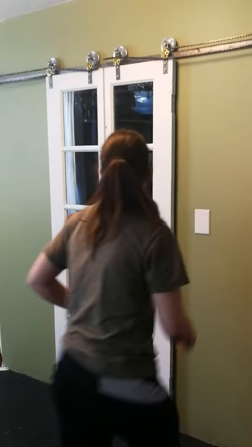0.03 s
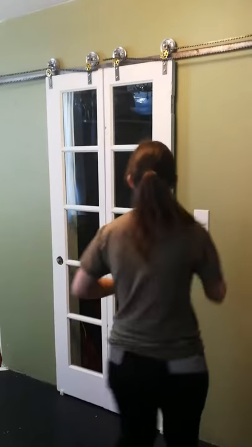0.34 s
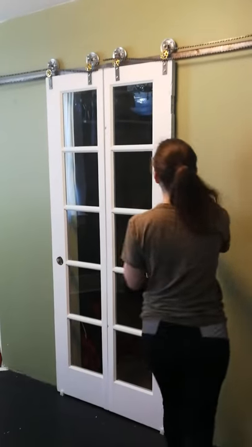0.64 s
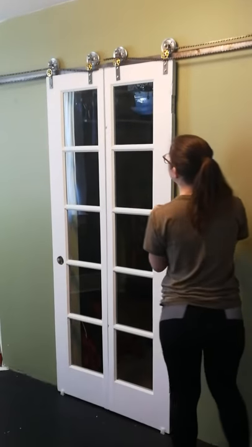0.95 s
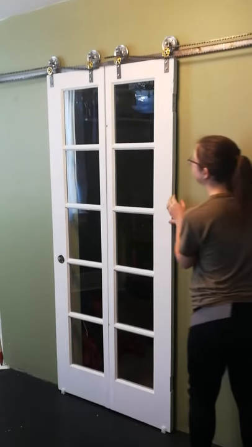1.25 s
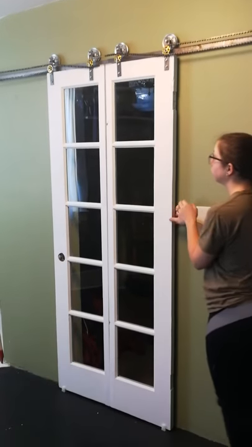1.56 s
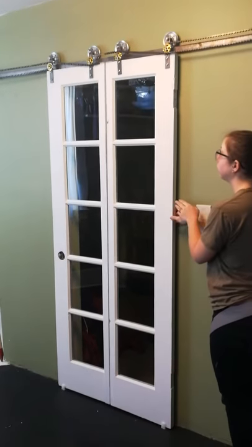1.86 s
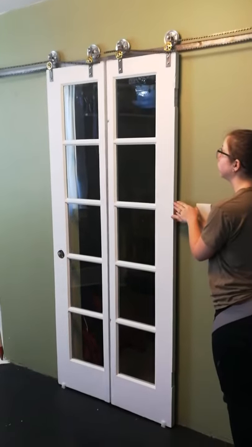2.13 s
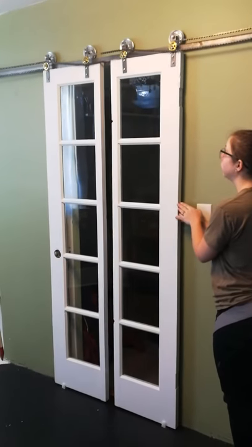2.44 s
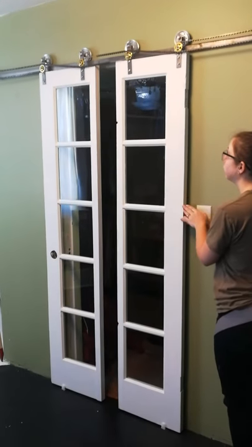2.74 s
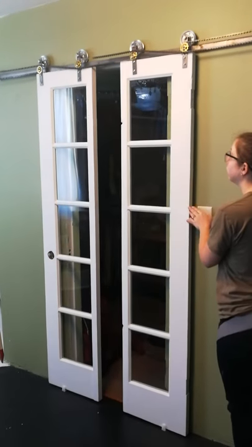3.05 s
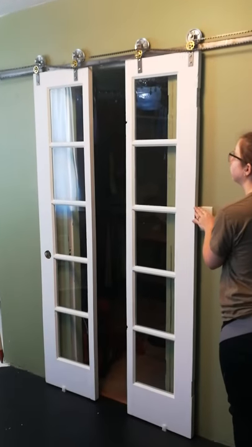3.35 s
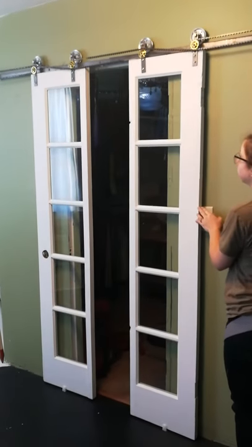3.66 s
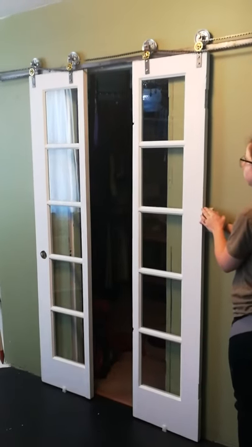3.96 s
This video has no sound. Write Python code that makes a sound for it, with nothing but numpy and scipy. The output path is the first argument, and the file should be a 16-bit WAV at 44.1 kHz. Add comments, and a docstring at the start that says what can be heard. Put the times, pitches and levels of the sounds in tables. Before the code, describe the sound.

Soft steps, then a chain clatters and rollers grind as hanging doors slide apart.

```python
"""A few soft, scuffing steps cross a quiet room, and a wall switch ticks. Then a chain drive pulls two
glazed doors apart: links clatter in bunches on sprocket and rail, rollers grind and scrape along the
overhead rail, and the hanging panels rumble and thud as they are tugged. It is all heard from a few
metres away, with plenty of room around it, over a faint hiss of air and the deep drone of the house."""
import sys
import numpy as np
from scipy import signal
from scipy.fft import rfft, irfft
from scipy.io import wavfile

SR = 44100
rng = np.random.default_rng(int(sys.argv[2]) if len(sys.argv) > 2 else 0)


def wav_record(signal):
    """Record a signal, one row per channel, as 16-bit PCM in the file named by sys.argv[1]."""
    frames = np.transpose(np.atleast_2d(signal))
    bounded = np.clip(frames, -1, 1)
    # unit amplitude maps onto the largest positive 16-bit level
    quanta = np.round(bounded * 32767).astype(np.int16)
    wavfile.write(sys.argv[1], SR, quanta)


N = 176400

# bunches of links striking sprocket and rail: start_s, level_db, jingle_db, knock_db, rattle_decay_s
CLACKS = [(1.9385, -43.5, -30, -15, 0.048), (1.9679, -41.5, -16, -6.5, 0.069),
          (2.0095, -35.5, -15.5, -10, 0.06), (2.0988, -34, -15, -4.5, 0.015),
          (2.157, -30.5, -18.5, -13, 0.042), (2.2111, -35, -7, -5.5, 0.0047),
          (2.2602, -34.5, -12.5, -11.5, 0.011), (2.3107, -29.5, -10, -16, 0.012),
          (2.3628, -31.5, -7.5, -22, 0.012), (2.4124, -31, -13, -11, 0.053),
          (2.4547, -29.5, -19.5, -16.5, 0.023), (2.554, -38.5, -15, -9, 0.02),
          (2.6283, -39, -19, -11, 0.0072), (2.6638, -37.5, -20, -15, 0.0093),
          (2.6864, -33.5, -24, -18, 0.024), (2.7074, -33.5, -13.5, -10, 0.0065),
          (2.7262, -38, -17, -23, 0.0072), (2.7928, -37.5, -18.5, -10, 0.013),
          (2.816, -36.5, -21, -19, 0.0096), (2.851, -32.5, -13, -12.5, 0.012),
          (2.8792, -40, -30, -32, 0.035), (2.9265, -34.5, -10.5, -13.5, 0.012),
          (2.9777, -32.5, -15.5, -12.5, 0.0032), (2.9921, -41.5, -18, -9, 0.0093),
          (3.065, -41, -12, -8.5, 0.021), (3.0971, -38.5, -18.5, -10, 0.015),
          (3.1176, -33, -18.5, -15, 0.015), (3.1369, -42, -13, -6.5, 0.03),
          (3.1945, -36.5, -18, -38, 0.0065), (3.2318, -34, -17, -6.5, 0.018),
          (3.2551, -40.5, -32, -4.5, 0.009), (3.3935, -42.5, -15, -7.5, 0.014),
          (3.4191, -40.5, -39, -9.5, 0.014), (3.4736, -38.5, -22.5, -12.5, 0.02),
          (3.5326, -39, -29, -10.5, 0.011), (3.55, -43, -17, -28, 0.016), (3.5777, -42, -12.5, -7, 0.022),
          (3.6389, -43.5, -12, -15.5, 0.0032), (3.693, -40.5, -7.5, -7.5, 0.016),
          (3.7284, -43, -16.5, -18, 0.0085), (3.7981, -40, -12, -9.5, 0.021),
          (3.8401, -38, -29, -21, 0.0049), (3.8786, -40.5, -19.5, -11, 0.023),
          (3.9371, -42, -26, -14, 0.01), (3.9583, -41.5, -16, -12.5, 0.0082), (3.985, -48, -20, -6, 0.017)]
# tone of a link's impact: frequency_hz, gain_db
LINK_COLOUR = [(200, -5), (330, 15), (500, -7), (800, -5), (1000, -3), (1570, 3.5), (2700, 4.5),
               (4240, 3.5), (5860, -11.5), (7150, -9.5), (9050, -19), (11600, -44), (15000, -46.5)]
# resonances of chain and rail: pitch_hz, width_hz, level_db
METAL_MODES = [(950, 10, -9), (3180, 1200, 10), (3740, 590, 2.5), (4450, 610, 12.5), (5500, 160, 0),
               (8300, 550, -13)]
# narrow resonances that sing on after each clack: pitch_hz, width_hz, level_db
STEEL_MODES = [(3576, 41, 1), (4318, 96, 4), (4745, 58, -6), (7520, 140, -6.5)]
# swell of the rollers' grind and the doors' rumble: time_s, grind_db, rumble_db
ROLLING_LEVELS = [(1.97, -55, -72), (2.009, -45, -64.5), (2.13, -42.5, -53.5), (2.31, -40, -62),
                  (2.49, -45, -55.5), (2.52, -47, -61.5), (2.57, -43, -55.5), (2.7, -53, -64),
                  (3.02, -47.5, -62), (3.06, -51.5, -76), (3.14, -46.5, -62), (3.3, -52.5, -66),
                  (3.38, -56.5, -83), (3.449, -56, -68.5), (3.89, -50.5, -81), (4.0, -50, -69)]
# tone of the grinding rollers: frequency_hz, gain_db
GRIND_COLOUR = [(200, 1.5), (500, 1.5), (900, 4.5), (1600, 6), (2300, 9.5), (3500, -4.5), (4400, 6),
                (6000, -7), (7800, -22), (10800, -20.5), (15000, -45)]
# fits of wheel scrape once the doors are under way: time_s, level_db
SCRAPE_LEVELS = [(2.6, -88.5), (2.73, -83), (2.78, -56.5), (2.92, -53.5), (2.995, -43), (3.06, -93),
                 (3.35, -80), (3.5, -61), (3.66, -57), (3.72, -51), (3.79, -81), (3.86, -70), (3.92, -66),
                 (4.0, -45.5)]
# resonances of the scraping wheels: pitch_hz, width_hz, level_db
WHEEL_MODES = [(3450, 80, 0), (4080, 140, -4), (4340, 190, -1)]
# tones of the struck rail: start_s, pitch_hz, level_db, decay_s
RAIL_RINGS = [(1.971, 1154, -51.5, 0.09), (1.97, 1610, -57, 0.044), (1.971, 1896, -54, 0.04),
              (2.095, 906, -41.5, 0.024), (2.19, 910, -38.5, 0.031), (2.45, 804, -51, 0.018),
              (3.715, 3480, -54.5, 0.031)]
# resonances of the hanging doors: pitch_hz, width_hz, level_db
DOOR_MODES = [(86, 12.7, 0.5), (127.7, 9.7, -2.5), (202, 33, -5), (242.7, 62, -5.5), (306.5, 21, -11.5)]
# heavy jolts of the doors: start_s, level_db, decay_s
JOLTS = [(2.035, -60, 0.047), (2.08, -53, 0.058), (2.42, -54, 0.03), (2.835, -52.5, 0.015),
         (3.12, -64.5, 0.039)]
# bassy tone of a jolt: frequency_hz, gain_db
JOLT_COLOUR = [(50, -21), (80, 14), (130, 6.5), (200, 5), (340, 0), (480, -21), (1000, -48)]
# pitched thuds of the tugged panels: start_s, pitch_hz, level_db, decay_s
PANEL_THUDS = [(2.085, 196, -48, 0.023), (2.114, 80.7, -43, 0.055), (2.335, 203.5, -52.5, 0.029),
               (3.129, 222.5, -53, 0.032), (3.311, 96.7, -55.5, 0.063)]
# slow sway of the doors: time_s, level_db
SWAY_LEVELS = [(1.97, -67), (2.35, -41), (2.65, -55), (3.01, -38.5), (3.09, -50.5), (3.27, -38.5),
               (3.3, -46.5), (4.0, -73)]
# soles and clothes brushing: peak_s, rise_s, fall_s, swish_db, scrape_db, footfall_db
STEPS = [(.29, 0.093, 0.074, -70.5, -106, -100), (.445, 0.041, 0.053, -60, -78, -60.5),
         (0.533, 0.042, 0.046, -56.5, -69.5, -73.5), (0.876, 0.069, 0.085, -58.5, -85, -66),
         (.95, 0.061, 0.08, -62, -65, -69), (1.09, 0.083, 0.038, -62, -87, -101),
         (1.341, 0.069, 0.043, -54, -56, -63), (3.32, 0.03, 0.075, -60, -62, -64.5)]
# airy swish of cloth: frequency_hz, gain_db
CLOTH_COLOUR = [(500, -18.5), (1300, -12), (2200, 1), (4500, 0.5), (6200, -3.5), (7600, 2), (9300, -1),
                (11000, -16.5), (15000, -24)]
# midrange scuff of a sole: frequency_hz, gain_db
SOLE_COLOUR = [(300, -45), (600, -12), (1000, -7.5), (1600, -4), (3000, -15.5), (8000, -35.5)]
# dull pad of a landing foot: frequency_hz, gain_db
FOOTFALL_COLOUR = [(100, -17), (200, -19), (280, 3.5), (410, -3.5), (540, -14), (1500, -27)]
# weight settling on the floor: start_s, pitch_hz, level_db, decay_s
FLOOR_THUDS = [(.48, 42.4, -61, 0.033), (0.68, 190.6, -66, 0.098), (1.057, 48.4, -52, 0.052),
               (1.138, 49, -53.5, 0.032)]
# ticks of the wall switch: start_s, pitch_hz, width_hz, level_db
SWITCH_TICKS = [(1.625, 3370, 1780, -41.5), (1.641, 3020, 1800, -41), (1.695, 1810, 600, -34.5),
                (1.7152, 2540, 447, -34), (1.7174, 2380, 380, -26.5), (1.731, 2200, 300, -39)]
# room tone: frequency_hz, gain_db
AIR_COLOUR = [(15, -12.5), (25, -3.5), (54, -5), (77, -9.5), (220, -19.5), (363, -23), (427, -27.5),
              (811, -29), (879, -24), (2700, -28.5), (4380, -30), (7680, -29.5), (15000, -40)]
# stereo placement of chain, wheels and rail: frequency_hz, left_minus_right_db
DRIVE_PAN = [(100, 0), (450, -2), (1000, -1.5), (2200, -6.5), (4000, -5), (6500, -3.5), (8000, -3.5),
             (10000, 8), (15000, -2)]

DRIVE_START_S, DRIVE_RISE_S = 1.935, 0.028
LINKS_PER_S, GRIT_PER_S, BUMPS_PER_S = 2600, 900, 220
CLACK_LEAD_S = 0.0015  # each clack starts just before its listed time
BUNCH_RISE_S, BUNCH_HOLD_S = 0.001, 0.0058
KNOCK_DB, CLANK_DB, JINGLE_DB = 23.5, 19, 32  # the chain's low, middle and high registers
KNOCK_TOP_HZ, JINGLE_BOTTOM_HZ = 1270, 5800
RATTLE_DB, METAL_RING_DB, STEEL_RING_DB = 6, -25.5, -25
GRIND_DB, RAIL_SING_DB, RUMBLE_DB, SWAY_DB = -5, -19.5, 4.5, -11
FLUTTER_HZ, FLUTTER_DB = 28, 2
PERSON_PAN_DB = -5.5  # left minus right
AIR_DB, DRONE_DB = -64, -69
TAIL_T60_S, TREBLE_T60_S, TAIL_BUILD_S, TAIL_DB = 0.33, 0.27, 0.0051, 1.5
ECHO_DECAY_S, ECHO_DB = 0.0092, 0.5
LEFT_LAG_S, MONO_BELOW_HZ = 0.00059, 444


def chain(size=8192, count=6):
    """Each clack is a dense crunch of links and a dying rattle, at one of several spots on the rail."""
    t = np.arange(size) / SR
    spots = np.zeros((count, N + 2 * size))
    link_tone = colour(LINK_COLOUR)
    for k, (start, db, jingle_db, knock_db, rattle_s) in enumerate(CLACKS):
        landing = np.exp(-(t / BUNCH_HOLD_S) ** 2) + undb(RATTLE_DB) * np.exp(-t / rattle_s)
        attack = 1 - np.exp(-t / BUNCH_RISE_S)
        links = grains(LINKS_PER_S, scatter_db=2, size=size) * landing * attack
        links[0] += undb(1)  # the first link gives the clack its edge
        hit = signal.fftconvolve(links, link_tone)[:size]
        clank = undb(CLANK_DB) * unit_energy(band(hit, [KNOCK_TOP_HZ, JINGLE_BOTTOM_HZ], "band"))
        jingle = undb(JINGLE_DB + jingle_db) * unit_energy(band(hit, JINGLE_BOTTOM_HZ, "high", order=5))
        knock = undb(KNOCK_DB + knock_db) * unit_energy(band(hit, [500, KNOCK_TOP_HZ], "band"))
        i = int((start - CLACK_LEAD_S) * SR)
        spots[k % count, i:i + size] += undb(db) * (clank + jingle + knock)
    out = 0
    for clacks in spots[:, :N]:
        sing = undb(STEEL_RING_DB) * convolve(clacks, ring(detuned(STEEL_MODES)))
        out += room(metal_body(clacks) + sing, wet_db=3.5)
    return out


def metal_body(x):
    """Chain and rail pass on the crack of an impact and add a short, faint ring."""
    body = undb(METAL_RING_DB) * ring(METAL_MODES)
    body[0] += 1
    return convolve(x, unit_energy(body))


def drive_engaged(t):
    """Quick fade-in as the drive takes up the load."""
    return np.clip((t - DRIVE_START_S) / DRIVE_RISE_S, 0, 1) ** 2


def rollers(t, count=4):
    """The wheels grind over the rail, which sings faintly at one pitch."""
    times, grind_db, _ = np.array(ROLLING_LEVELS).T
    load = drive_engaged(t) * undb(np.interp(t, times, grind_db)) / np.sqrt(count)
    out = 0
    for _ in range(count):
        grit = unit(metal_body(convolve(grains(GRIT_PER_S, scatter_db=4.5), colour(GRIND_COLOUR))))
        sing = unit(pitched_noise(pitch_hz=893, width_hz=7.9))
        out += room(load * (undb(GRIND_DB) * grit + undb(RAIL_SING_DB) * sing), wet_db=-6)
    return out


def wheel_scrape(t, count=3):
    """The wheels rub the rail unevenly and ring in bright, fluttering fits."""
    load = drive_engaged(t) * undb(np.interp(t, *np.array(SCRAPE_LEVELS).T)) / np.sqrt(count)
    out = 0
    for _ in range(count):
        flutter = undb(FLUTTER_DB * unit(band(rng.standard_normal(N), FLUTTER_HZ, "low", order=2)))
        friction = flutter * grains(per_s=1500, scatter_db=2.5)
        ringing = convolve(friction, ring(detuned(WHEEL_MODES)))
        out += room(load * unit(band(ringing, [3000, 4900], "band", order=2)), wet_db=4)
    return out


def rail(t):
    """The rail rings as the chain pulls taut or a wheel knocks it."""
    return room(struck_tones(t, RAIL_RINGS, rise_s=0.0029), wet_db=-10.5)


def door_rumble(t):
    """Bumps of the wheels shake the hanging panels; the chain jolts them now and then."""
    times, _, rumble_db = np.array(ROLLING_LEVELS).T
    load = drive_engaged(t) * undb(RUMBLE_DB + np.interp(t, times, rumble_db))
    shaking = unit(convolve(grains(BUMPS_PER_S, scatter_db=1), ring(DOOR_MODES)))
    jolts = sum(blow(t, start, db, decay, rise_s=0.022) for start, db, decay in JOLTS)
    return load * shaking + jolts * noise(JOLT_COLOUR)


def door_thuds(t):
    """Each tug draws one low note from the panels."""
    return struck_tones(t, PANEL_THUDS, rise_s=0.014)


def door_sway(t):
    """Doors and wall shudder in the sub-bass."""
    shudder = unit(band(pitched_noise(pitch_hz=31.5, width_hz=10.4), [27, 48], "band", order=2))
    return drive_engaged(t) * undb(SWAY_DB + np.interp(t, *np.array(SWAY_LEVELS).T)) * shudder


def steps(t):
    """Each soft step swells and fades with its own echoes: cloth swishes, the sole scuffs and lands."""
    layers = np.array([noise(CLOTH_COLOUR), noise(SOLE_COLOUR), noise(FOOTFALL_COLOUR)])
    out = 0
    for peak, rise, fall, *layer_db in STEPS:
        swell = np.exp(-(np.minimum(t - peak, 0) / rise) ** 2 - np.maximum(t - peak, 0) / fall)
        out += room(swell * (undb(layer_db) @ layers), wet_db=5)
    return out


def floorboards(t):
    """The floor gives underfoot with deep, faint thuds."""
    return struck_tones(t, FLOOR_THUDS, rise_s=0.0096)


def wall_switch():
    """The pressed switch gives tiny ticks that ring for a few milliseconds."""
    out = np.zeros(N)
    for start, hz, width, db in SWITCH_TICKS:
        edges_hz = [max(hz - width, hz / 2), hz + width]
        tick = unit_energy(band(ring([(hz, width, 0)]), edges_hz, "band", order=2))
        i = int(start * SR)
        out[i:i + len(tick)] += undb(db) * tick
    return room(out, wet_db=-6)


def room_tone():
    """A faint bed of air over the deep drone of the house."""
    drone = unit(band(pitched_noise(pitch_hz=44.3, width_hz=1.6), [36, 56], "band", order=2))
    return undb(AIR_DB) * diffuse(noise(AIR_COLOUR), noise(AIR_COLOUR)) + undb(DRONE_DB) * drone


def room(x, wet_db):
    """Direct sound, arriving first on the right, then echoes off near walls and a short tail."""
    t = np.arange(SR // 2) / SR
    walls = []
    for _ in range(2):
        hiss = rng.standard_normal(len(t))
        low = band(hiss, 6000, "low", order=1)
        tail = low * undb(-60 * t / TAIL_T60_S) + (hiss - low) * undb(-60 * t / TREBLE_T60_S)
        tail *= 1 - np.exp(-t / TAIL_BUILD_S)
        echoes = grains(per_s=1500, scatter_db=5.5, size=len(t)) * np.exp(-t / ECHO_DECAY_S)
        walls.append(undb(TAIL_DB) * unit_energy(tail) + undb(ECHO_DB) * unit_energy(echoes))
    left, right = undb(wet_db) * diffuse(*walls)
    right[0] += 1
    left[round(LEFT_LAG_S * SR)] += 1
    return np.array([convolve(x, unit_energy(left)), convolve(x, unit_energy(right))])


def diffuse(a, b, steepness=3.2):
    """Spread two signals into sound from all sides: centred bass, wide treble."""
    alike = np.exp(-(np.fft.rfftfreq(len(a), 1 / SR) / MONO_BELOW_HZ) ** steepness)
    mid = irfft(rfft(a) * np.sqrt((1 + alike) / 2))
    side = irfft(rfft(b) * np.sqrt((1 - alike) / 2))
    return np.array([mid + side, mid - side])


def blow(t, start, db, decay_s, rise_s):
    """Envelope of a soft blow: straight attack, exponential release."""
    attack = np.clip((t - start) / rise_s, 0, 1)
    return undb(db) * attack * np.exp(-np.maximum(t - start - rise_s, 0) / decay_s)


def struck_tones(t, table, rise_s):
    """Damped tones set off by soft blows."""
    return sum(blow(t, start, db, decay, rise_s) * np.sin(2 * np.pi * hz * (t - start))
               for start, hz, db, decay in table)


def ring(modes):
    """Response of damped resonances: the wider, the shorter."""
    t = np.arange(SR // 2) / SR
    tones = (undb(db) * unit_energy(np.sin(2 * np.pi * hz * t) * np.exp(-np.pi * width * t))
             for hz, width, db in modes)
    return unit_energy(sum(tones))


def detuned(modes, spread=0.035):
    """Resonances shift a little from one spot on the rail to the next."""
    shifts = 1 + spread * rng.uniform(-1.32, 1, len(modes))
    return [(hz * shift, width, db) for (hz, width, db), shift in zip(modes, shifts)]


def grains(per_s, scatter_db, size=N):
    """Random tiny impacts of uneven strength."""
    impacts = (rng.random(size) < per_s / SR) * rng.choice([-1, 1], size)
    return impacts * undb(scatter_db * np.clip(rng.standard_normal(size), -2, 2))


def pitched_noise(pitch_hz, width_hz):
    """A wavering tone: noise through one resonance."""
    return convolve(rng.standard_normal(N), ring([(pitch_hz, width_hz, 0)]))


def noise(curve):
    """Coloured noise, rms 1."""
    return unit(convolve(rng.standard_normal(N), colour(curve)))


def colour(curve, size=4096):
    """Minimum-phase response of an EQ curve, which keeps attacks sharp."""
    cepstrum = irfft(np.log(gain_at(curve, np.fft.rfftfreq(size, 1 / SR))))
    cepstrum[1:size // 2] *= 2
    cepstrum[size // 2 + 1:] = 0
    return unit_energy(irfft(np.exp(rfft(cepstrum))))


def gain_at(curve, hz):
    """Gain of an EQ curve on a log-frequency axis."""
    points_hz, db = np.array(curve).T
    return undb(np.interp(np.log(hz + 1), np.log(points_hz), db))


def band(x, hz, kind, order=3):
    """Butterworth filter."""
    return signal.sosfilt(signal.butter(order, hz, kind, fs=SR, output="sos"), x + 1e-18)


def convolve(x, response):
    """Pass a sound through a response."""
    return signal.fftconvolve(x, response)[:N]


def undb(db):
    """Decibels to gain."""
    return 10 ** (np.asarray(db) / 20)


def unit(x):
    """Scale to rms 1."""
    return x / np.sqrt(np.mean(x ** 2))


def unit_energy(x):
    """Scale to energy 1."""
    return x / np.sqrt(np.sum(x ** 2) + 1e-18)


def scene():
    """Drive and person sit towards the right; panels, floor and room tone fill the middle."""
    t = np.arange(N) / SR
    drive = chain() + rollers(t) + wheel_scrape(t) + rail(t)
    pan = np.sqrt(gain_at(DRIVE_PAN, np.fft.rfftfreq(N, 1 / SR)))
    drive = irfft(rfft(drive) * np.array([pan, 1 / pan]), N)
    person = (steps(t) + wall_switch()) * undb([[PERSON_PAN_DB / 2], [-PERSON_PAN_DB / 2]])
    panels = diffuse(door_rumble(t), door_rumble(t)) + door_thuds(t) + door_sway(t)
    return drive + panels + person + floorboards(t) + room_tone()


def record(dry):
    """A moment of silence, then a fast fade-in; the deepest bass and the very top are cut."""
    silence_s, fade_s, low_cut_hz, high_cut_hz = 0.232, 0.0086, 10, 15700
    fade_in = np.clip((np.arange(N) / SR - silence_s) / fade_s, 0, 1)
    high_cut = signal.ellip(10, 0.2, 70, high_cut_hz, fs=SR, output="sos")
    return signal.sosfilt(high_cut, band(dry, low_cut_hz, "high", order=2) * fade_in)


dry = scene()
out = record(dry)
wav_record(out)
```